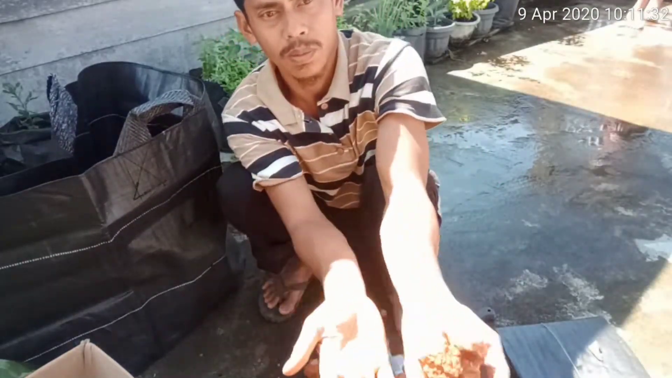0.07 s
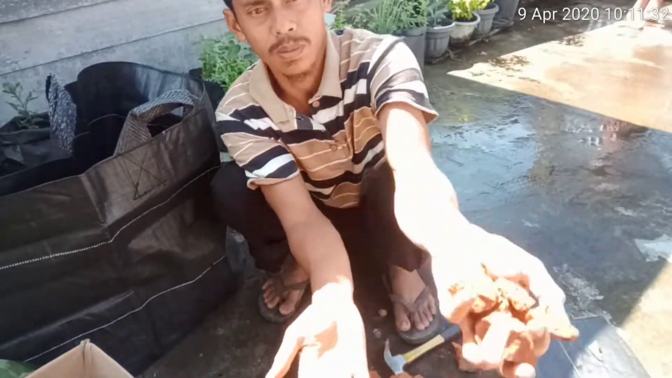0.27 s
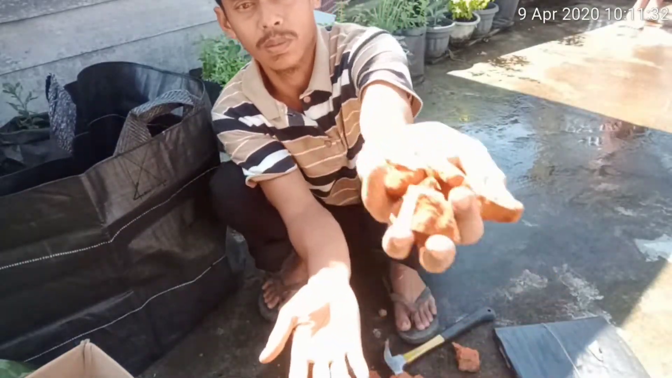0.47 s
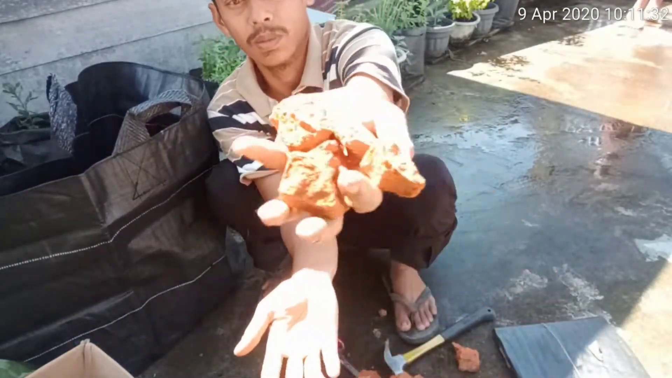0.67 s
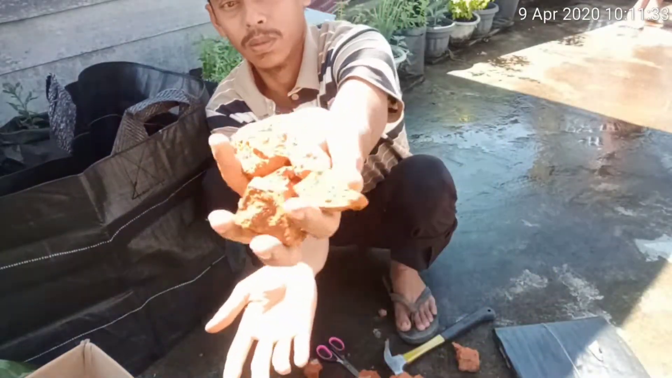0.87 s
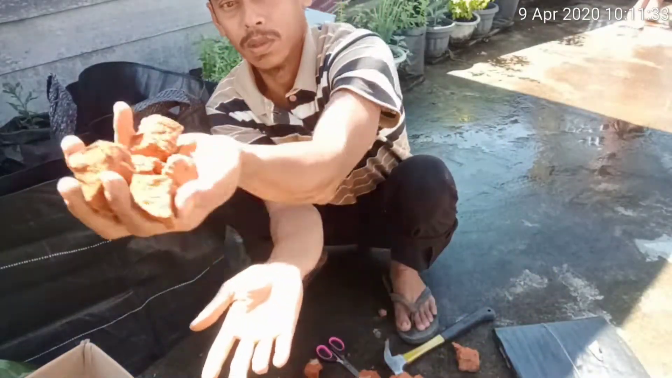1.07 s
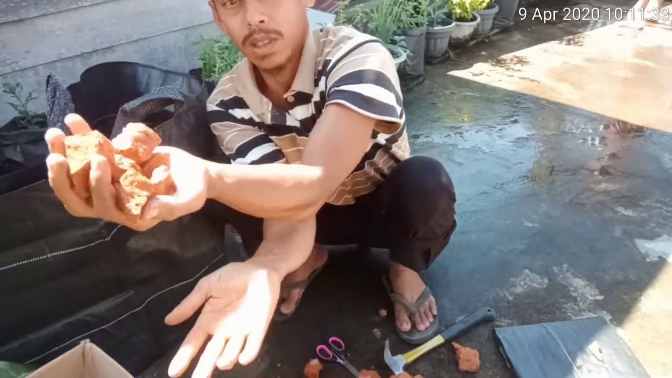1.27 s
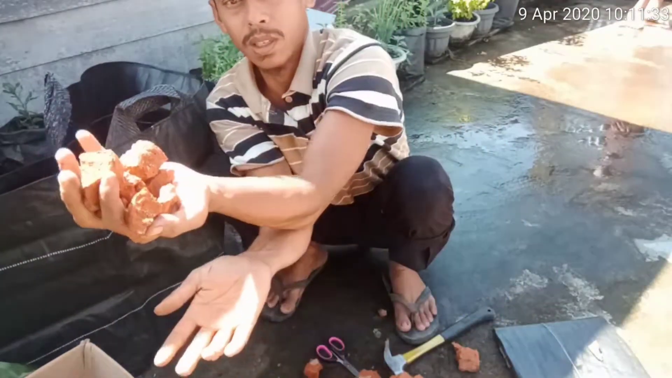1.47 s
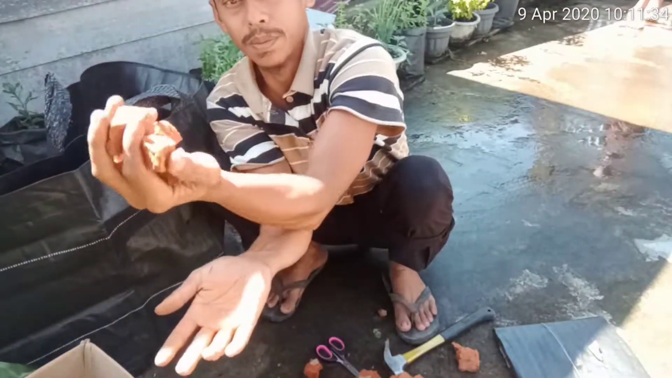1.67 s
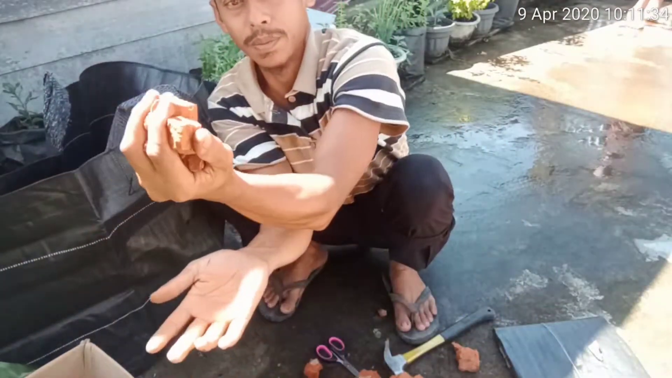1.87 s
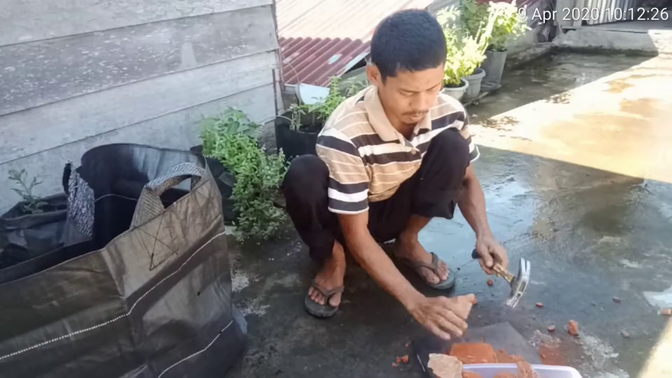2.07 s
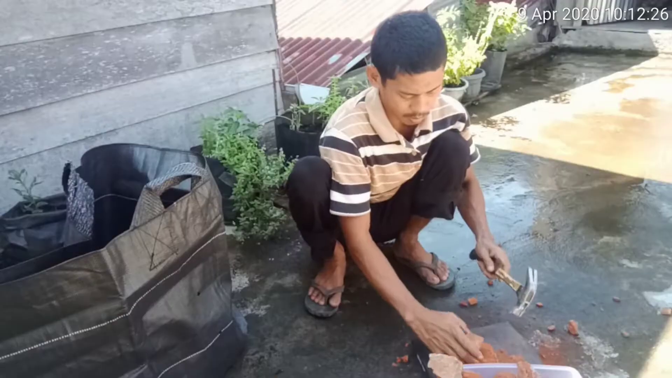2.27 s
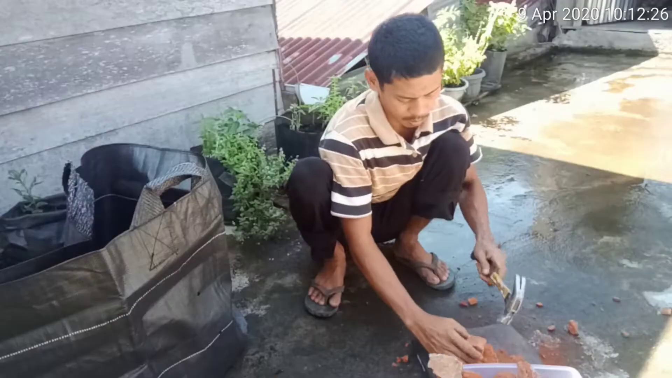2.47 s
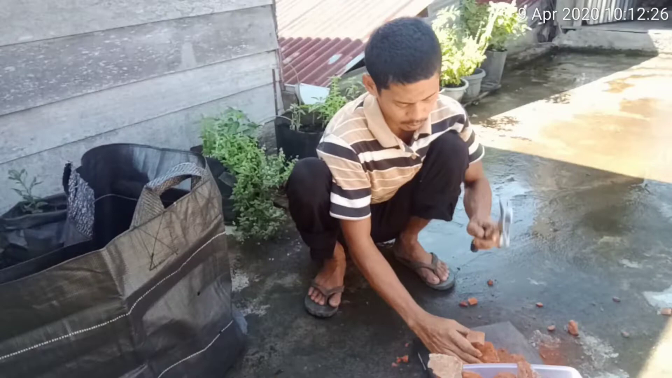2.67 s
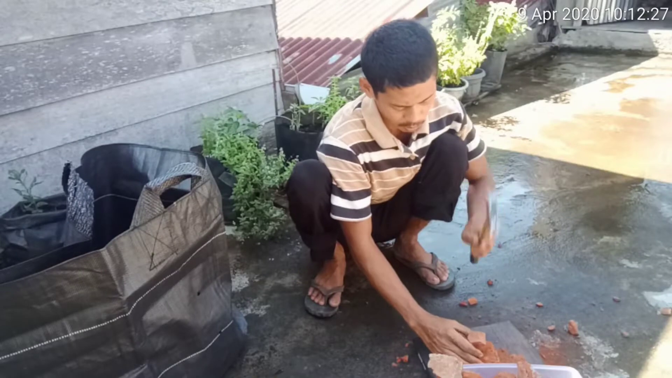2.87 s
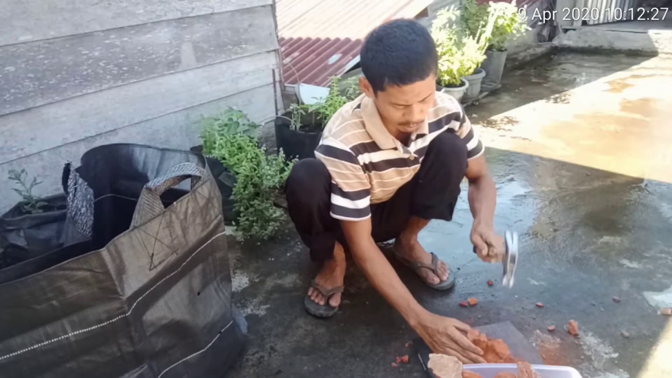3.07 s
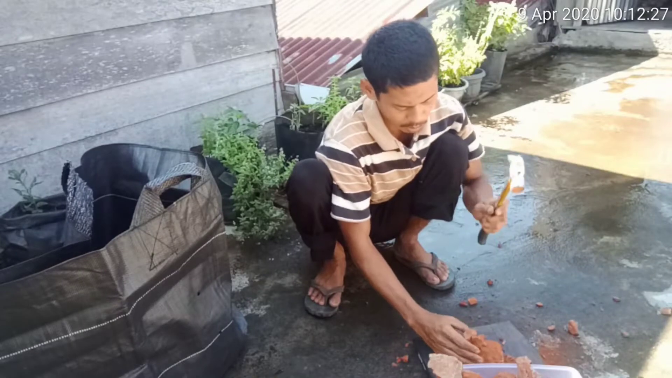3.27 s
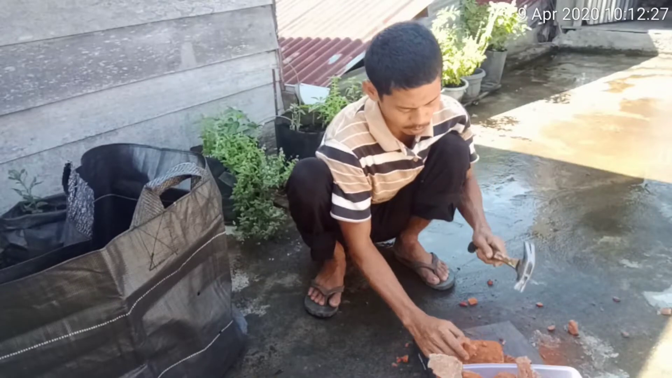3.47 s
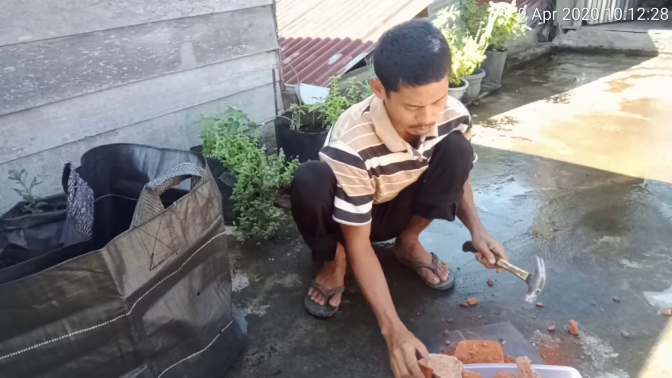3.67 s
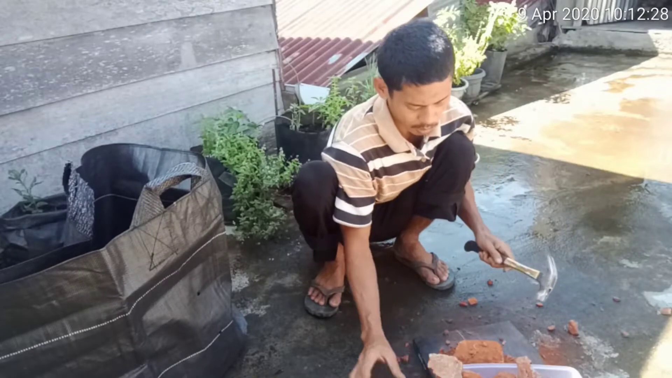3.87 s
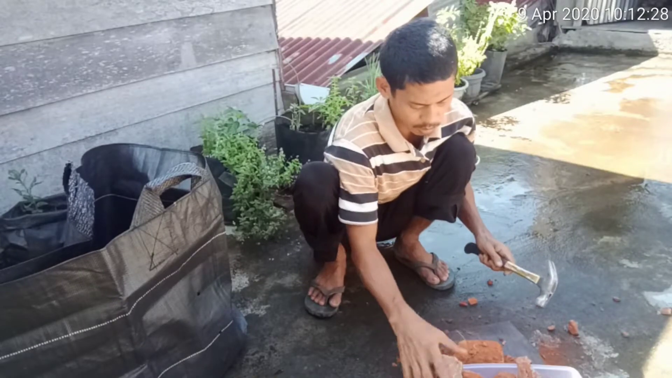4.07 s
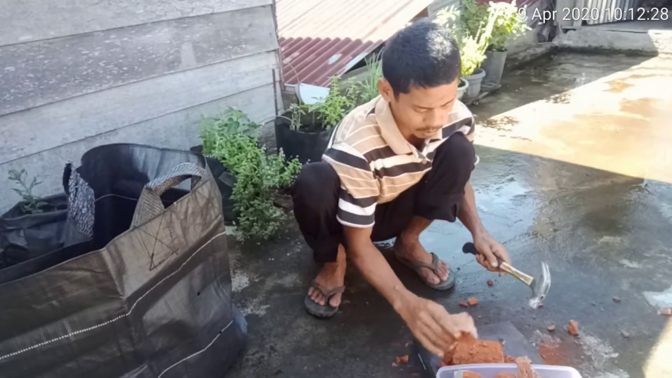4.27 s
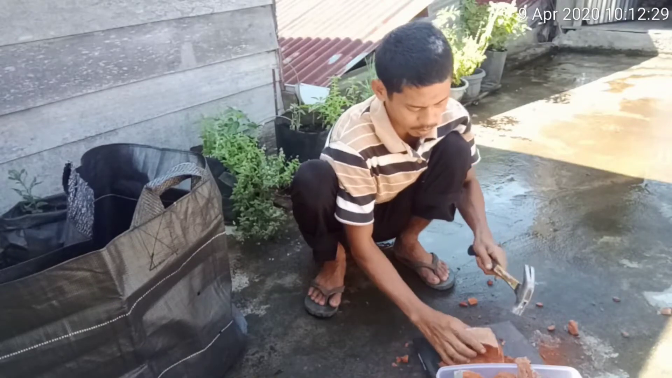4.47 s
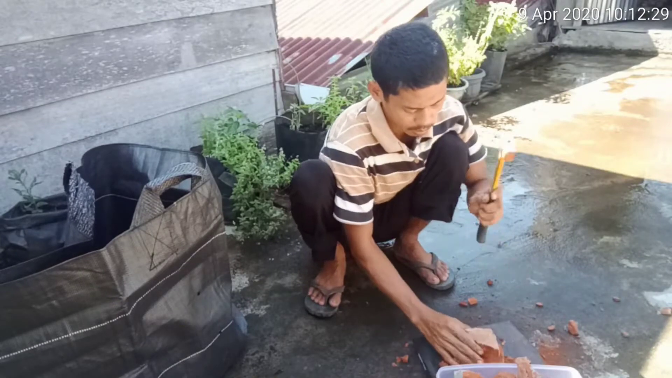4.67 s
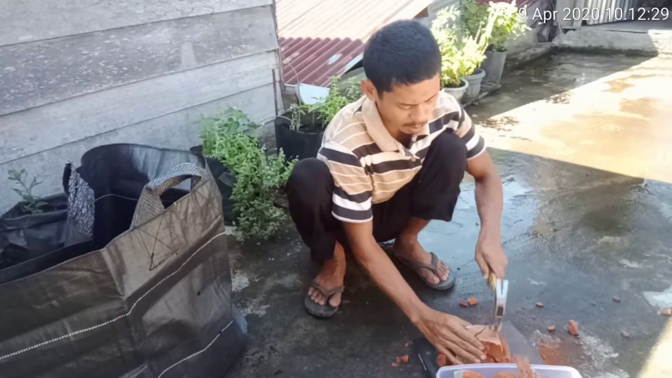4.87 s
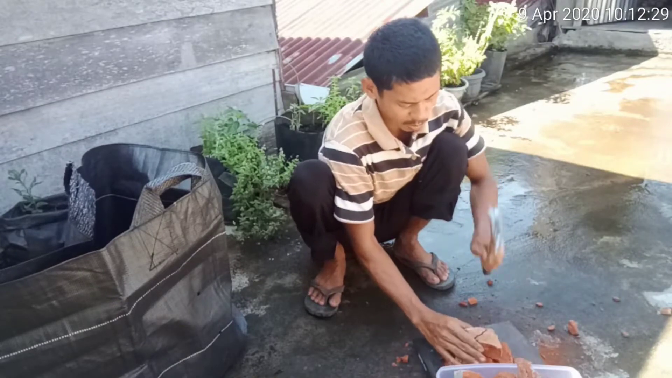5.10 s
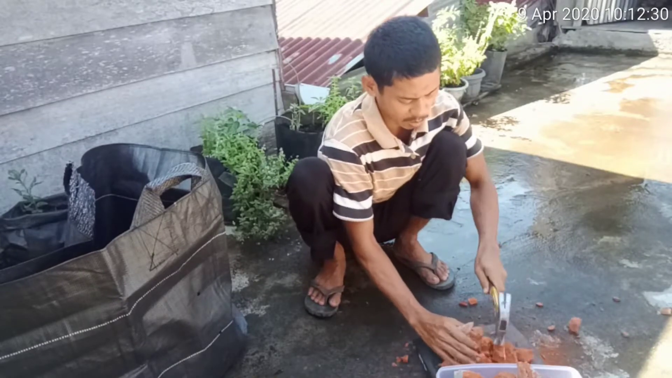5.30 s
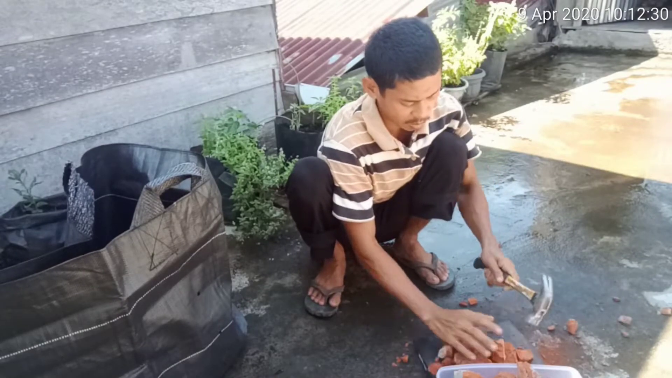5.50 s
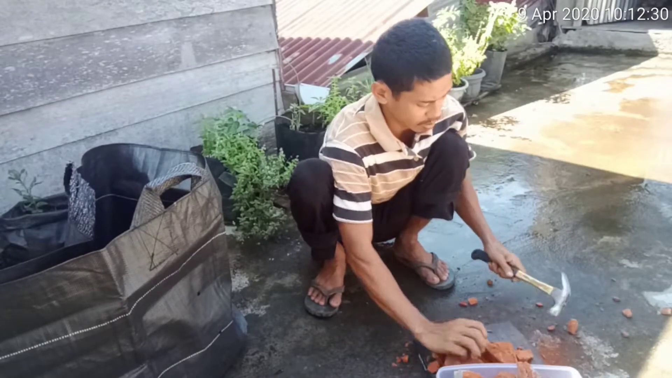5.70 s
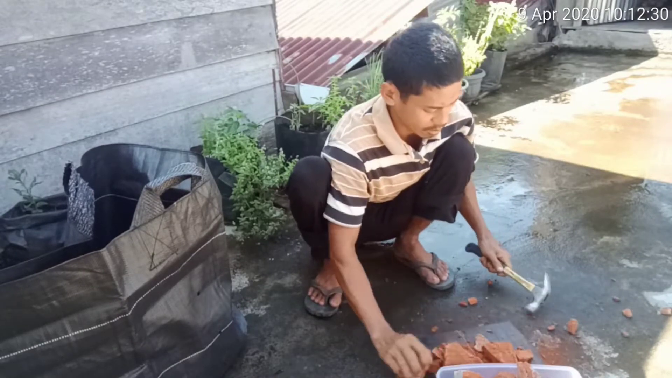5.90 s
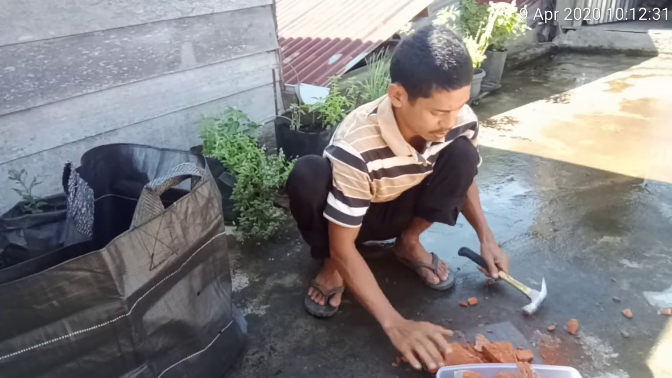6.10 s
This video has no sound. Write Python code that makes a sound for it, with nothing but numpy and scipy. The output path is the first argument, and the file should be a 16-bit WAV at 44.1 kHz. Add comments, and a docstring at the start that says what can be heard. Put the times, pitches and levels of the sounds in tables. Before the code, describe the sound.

Outdoor phone-like pickup, thin in the bass and slightly overloaded on the hits. Hen squawks ring at a little distance with yard echoes while gusts rumble at the microphone. After a quick dip, brick bits click and grit rubs nearby, a hammer strikes once, pieces are shifted on hollow tile, then two more sharp blows scatter fragments. Soft clucks continue behind.

```python
"""A hen squawks four times on a concrete rooftop: hoarse pulses and breath clear into a stack of overtones.
A hammer breaks clay brick on a hollow tile in three blows: snap, spreading crack, ringing tile and slab.
Brick pieces knock the tile (modes), shards click (short modes and a tick), grit scrapes (coloured grains).
Other fowl cluck softly further off (falling notes and rasp); gusts rumble and a town hums (shaped noise).
The sound fades out and in again once; it comes back louder."""
import sys
import numpy as np
from scipy import signal
from scipy.fft import rfft, irfft, next_fast_len
from scipy.io import wavfile
from scipy.ndimage import uniform_filter1d

SR = 44100
rng = np.random.default_rng(int(sys.argv[2]) if len(sys.argv) > 2 else 0)


def int16_out(signal):
    """Quantize to a 16-bit WAV file."""
    q = np.round(np.clip(np.atleast_2d(signal).T, -1, 1) * 32767)
    wavfile.write(sys.argv[1], SR, q.astype(np.int16))


N = 270818


def amp(db):
    """Decibels to linear amplitude."""
    return 10 ** (np.asarray(db) / 20)


def evened(x):
    """Scales x to unit RMS."""
    return x / np.sqrt(np.mean(x ** 2) + 1e-20)


def read(points, hz):
    """Reads a table of (frequency, value) on a log frequency axis."""
    f, value = np.transpose(points)
    return np.interp(np.log(hz + 1), np.log(f + 1), value)


def read_time(points, t):
    """Reads a table of (time, value)."""
    return np.interp(t, *np.transpose(points))


def add(mix, start_s, sound):
    """Adds sound into mix in place, cut at the end of mix."""
    part = mix[round(start_s * SR):][:len(sound)]
    part += sound[:len(part)]


def colour(x, points):
    """Filters x by a table of (frequency, gain), at unit RMS."""
    size = next_fast_len(len(x))
    gain = amp(read(points, np.fft.rfftfreq(size, 1 / SR)))
    return evened(irfft(rfft(x, size) * gain, size)[:len(x)])


def wobble(size, hz):
    """Random drift of unit RMS, low-passed at hz."""
    b, a = signal.butter(2, 2 * hz / SR)
    return evened(signal.lfilter(b, a, rng.standard_normal(size + 4000))[4000:])


def patchwork(shape, bins, frames):
    """Random time-frequency patches of unit RMS."""
    noise = rng.standard_normal(shape)
    return evened(uniform_filter1d(uniform_filter1d(noise, bins, 0), frames, 1))


def ring(hz, t60_s, t):
    """One damped mode."""
    return np.sin(2 * np.pi * hz * t) * amp(-60 * t / t60_s)


# wind spectrum: (frequency [Hz], relative gain [dB])
WIND_SPECTRUM = [(18, -68.5), (30, -18.5), (129, 0), (253, -10.5), (409, -21), (450, -38.5), (500, -24),
                 (650, -71), (1100, -120)]
# gusts at the microphone: (time [s], level [dB])
GUST_LEVELS = [(0.0, -39), (0.09, -35.5), (0.22, -40.5), (0.41, -38), (0.72, -39), (1.2, -45.5),
               (1.57, -42.5), (1.85, -45.5), (2.34, -53.5), (2.82, -53.5), (3.13, -52), (4.75, -52.5),
               (5.1, -50), (5.3, -55), (5.73, -56.5), (6.14, -48)]


def wind():
    """Turbulence at the microphone: low noise, lumpy in level, under the gust curve."""
    level_db = read_time(GUST_LEVELS, np.arange(N) / SR)
    return colour(rng.standard_normal(N), WIND_SPECTRUM) * amp(level_db + 2.15 * wobble(N, 11.0))


# town hum spectrum: (frequency [Hz], relative gain [dB])
HUM_SPECTRUM = [(240, -38.5), (400, -2), (481, -2.5), (753, -2), (964, -8.5), (1220, -5), (1510, -13.5),
                (2020, -13), (4380, -21), (6850, -27.5), (16000, -37)]
# hum drift: (time [s], level above HUM_DB [dB])
HUM_DRIFT = [(0, 13.5), (.7, 7), (1.9, 7), (2.3, 3.5), (2.9, 2), (3.6, 4.5), (4.4, 2.5), (5.15, 0.5),
             (6.14, -0.5)]
HUM_DB = -65


def town_hum():
    """Distant town: shaped noise whose level varies in time-frequency patches."""
    hz, _, z = signal.stft(rng.standard_normal(N + 1024), SR, nperseg=1024, noverlap=768)
    depth_db = np.where(hz < 6500, 2.9, 1.2)[:, None]
    z = z * amp(read(HUM_SPECTRUM, hz)[:, None] + depth_db * patchwork(z.shape, 10, 12))
    hum = evened(signal.istft(z, SR, nperseg=1024, noverlap=768)[1][:N])
    return hum * amp(HUM_DB + read_time(HUM_DRIFT, np.arange(N) / SR))


# squawks: (start [s], hoarse part [s], clear part [s], effort [dB], hoarse part softer by [dB],
# sag over the clear part [dB], base pitch [Hz], hoarseness before clearing [0-1], hoarseness after [0-1])
SQUAWK_ROWS = [(0.062, 0.096, 0.11, -31.5, 1.2, 0.4, 607.8, 0.75, 0.05),
               (1.392, 0.078, 0.16, -31.5, 2, 5, 602.4, 0.85, 0.06),
               (2.985, 0.155, 0.11, -34.5, 4.2, 8.1, 610.7, 0.4, 0.06),
               (6.017, 0.045, 0.22, -36, 0.67, .4, 589, 0.9, 0.7)]
# clean note: (multiple of pitch, relative level [dB])
NOTE_PARTIALS = [(1, -12.5), (2, -1.5), (3, -9.5), (4, -5.5), (5, -24.5), (6, -15), (7, -35.5), (8, -35.5),
                 (9, -32), (10, -53), (11, -50.5), (12, -39.5), (13, -41), (14, -37), (15, -37.5),
                 (16, -35), (17, -52.5)]
# hoarse rasp: (frequency [Hz], relative gain [dB])
RASP_SPECTRUM = [(300, -28.5), (600, -25), (820, -13.5), (1250, -12), (1500, -14.5), (2500, -18),
                 (3800, -21), (4600, -36.5), (5600, -33.5), (6300, -49), (9500, -47), (12000, -60.5)]
ONSET_S, ONSET_DB, RASP_ONSET_DB = 0.035, -8, -1.5  # start level, rising to 0 dB
RELEASE_S, RELEASE_DB = 0.021, 0.5  # slight lift just before the cut-off
CLEARING_S, RASP_LINGERS_S = 0.014, 0.018
SCOOP, SCOOP_S = .2, .025  # pitch slides up from this share below
STRAIN, CREEP_HZ_PER_S = .07, 70  # pitch overshoot while hoarse, steady upward creep
WANDER = .005  # slow pitch drift (share)
VEIL_DB = -4.5  # partials other than the second, before clearing
SLIP_CHANCE, BREATH = .05, .4  # miscount of the pulse triples; breath noise share


def hen_pitch_hz(t, hoarse_s, base_hz, hoarse_before):
    """Voice pitch: scoop up, strained overshoot, steady creep."""
    strain = STRAIN * hoarse_before ** 2 * np.clip(4 * (1 - t / hoarse_s), 0, 1)
    return base_hz * (1 - SCOOP * np.exp(-t / SCOOP_S) + strain) + CREEP_HZ_PER_S * (t - hoarse_s)


def clear_note(turns, cleared):
    """Harmonic stack; each partial wavers on its own."""
    note = np.zeros(len(turns))
    for k, db in NOTE_PARTIALS:
        veil_db = 0 if k == 2 else VEIL_DB * (1 - cleared)
        waver_db = (1.6 if k == 2 else 2.6) * wobble(len(turns), 35)
        note += amp(db + veil_db + waver_db) * np.cos(2 * np.pi * (k * turns + rng.random()))
    return evened(note)


def hoarse_rasp(turns, t):
    """Voice pulses stressed in threes plus breath, smeared by near surfaces."""
    size = len(t)
    beats = np.diff(np.floor(turns + .02 * wobble(size, 200)), prepend=0) > 0
    count = np.cumsum(beats * (1 + (rng.random(size) < SLIP_CHANCE)))
    strong = count % 3 == 0
    pulses = beats * (strong - 0.25) * amp(1.5 * rng.standard_normal(size))
    source = evened(pulses) + BREATH * rng.standard_normal(size)
    scatter = rng.standard_normal(800) * np.exp(-np.arange(800) / 180)
    rasp = colour(signal.oaconvolve(source, scatter)[:size], RASP_SPECTRUM)
    return rasp * amp(RASP_ONSET_DB * np.maximum(1 - t / ONSET_S, 0))


def squawk(hoarse_s, clear_s, effort_db, soft_db, sag_db, base_hz, hoarse_before, hoarse_after):
    """Rough voicing gives way to steadier voicing: rasp crossfades towards the harmonic stack."""
    t = np.arange(0, hoarse_s + clear_s, 1 / SR)
    since_clear_s = t - hoarse_s
    cleared = np.clip(since_clear_s / CLEARING_S + .5, 0, 1)
    settled = np.clip(since_clear_s / RASP_LINGERS_S - .5, 0, 1)
    hoarse = np.clip(hoarse_before + (hoarse_after - hoarse_before) * settled, 0, .95)

    level_db = effort_db - soft_db * (1 - cleared) - sag_db * np.maximum(since_clear_s, 0) / clear_s
    level_db += ONSET_DB * np.maximum(1 - t / ONSET_S, 0)
    level_db += RELEASE_DB * np.maximum(1 - (t[-1] - t) / RELEASE_S, 0)

    jitter = (0.002 + .01 * hoarse) * wobble(len(t), 70) + WANDER * wobble(len(t), 15)
    turns = np.cumsum(hen_pitch_hz(t, hoarse_s, base_hz, hoarse_before) * (1 + jitter)) / SR
    voice = np.sqrt(1 - hoarse ** 2) * clear_note(turns, cleared)
    voice += hoarse * amp(1.5) * hoarse_rasp(turns, t)
    return amp(level_db) * voice * signal.windows.tukey(len(t), .06)


# reverberation: (frequency [Hz], t60 [s])
YARD_T60 = [(200, 0.2), (1200, 0.4), (3000, 0.4), (9000, 0.46)]


def yard(x):
    """Walls and roofs around: sparse echoes of random sign, each band dying at its own speed."""
    taps = np.zeros(SR)
    at = np.arange(500, SR - 20, 20) + rng.integers(0, 20, (SR - 501) // 20)
    taps[at] = rng.choice([-1., 1.], at.shape)
    hz, t, z = signal.stft(taps, SR, nperseg=256)
    decay = amp(-60 * t / read(YARD_T60, hz)[:, None])
    tail = signal.istft(z * decay, SR, nperseg=256)[1]
    return signal.fftconvolve(x, tail / np.linalg.norm(tail))[:N]


FAR_WALL_S, FAR_WALL_DB = .18, -24.5


def far_wall(fowl):
    """One late, dull, diffuse echo, undelayed here."""
    smear = colour(rng.standard_normal(1600), [(2500, 0), (6000, -20)]) / 40  # unit energy
    return amp(FAR_WALL_DB) * signal.oaconvolve(fowl, smear)[:N]


def crumbs(size, per_s, share, patchy_db):
    """Dense fine friction with separate larger grains; each bit of clay rings briefly in its own band."""
    hits = rng.random(size) < per_s / SR
    boost_db = 1.5 * np.minimum(rng.exponential(1, size), 3)
    grains = hits * rng.standard_normal(size) * amp(boost_db)
    friction = rng.standard_normal(size) + share * evened(grains)
    z = signal.stft(friction, nperseg=256, noverlap=192)[2]
    z = z * amp(patchy_db * patchwork(z.shape, 5, 9))
    return signal.istft(z, nperseg=256, noverlap=192)[1][:size]


# grit on concrete; at 4.45 s the short noise of a brick piece knocking:
# (start [s], rise [s], hold [s], decay t60 [s], grind level [dB], hiss level [dB])
GRIT_ROWS = [(0.524, 0.023, 0.013, 0.19, -73, -46.5), (2.207, 0.011, 0.036, 0.15, -43.5, -54.5),
             (2.532, 0.03, 0.045, 0.13, -48.5, -56.5), (3.002, 0.013, 0.0058, 0.99, -38.5, -60),
             (3.015, 0.011, 0.16, 0.26, -51, -53.5), (3.992, 0.029, 0.0071, 0.14, -50.5, -87),
             (4.192, 0.016, 0.011, 0.15, -39, -63.5), (4.45, 0.0034, 0.0087, 0.06, -38, -50.5),
             (4.46, 0.01, .005, 1.6, -56, -66.5), (4.885, 0.017, 0.0044, 0.5, -34.5, -46.5),
             (5.239, 0.015, 0.14, 0.61, -41.5, -52), (5.663, 0.058, 0.003, 0.3, -43, -48.5),
             (5.801, 0.034, 0.21, 0.34, -56, -66)]
# dull part: (frequency [Hz], relative gain [dB])
GRIND_SPECTRUM = [(300, 2.5), (600, 7.5), (1250, 2.5), (2000, 1), (3500, -7.5), (5000, -10.5),
                  (8000, -40.5)]
# bright part: (frequency [Hz], relative gain [dB])
HISS_SPECTRUM = [(2500, -16.5), (4500, -5.5), (6500, -6), (7500, -4), (8500, -12.5), (11000, -10.5),
                 (13000, -29), (15500, -18.5)]
SLIP_IN_DB = -18  # start of the rise, relative to the hold


def grit(rise_s, hold_s, t60_s, grind_db, hiss_db):
    """Many small grains slipping: a dull grind and a bright hiss from the same lumpy motion."""
    t = np.arange(0, rise_s + hold_s + t60_s / 2, 1 / SR)
    stroke_db = SLIP_IN_DB * np.maximum(1 - t / rise_s, 0)
    stroke_db -= 60 * np.maximum(t - rise_s - hold_s, 0) / t60_s
    lumps_db = wobble(len(t), 200) + 2.1 * wobble(len(t), 45)
    slips = crumbs(len(t), 500, .5, patchy_db=3.5) * amp(lumps_db)
    grind = amp(grind_db) * colour(slips, GRIND_SPECTRUM)
    hiss = amp(hiss_db) * colour(slips, HISS_SPECTRUM)
    return amp(stroke_db) * (grind + hiss)


# distant clucks, and at 2.185 s the dying tail of a squawk:
# (start [s], note level [dB], pitch [Hz], length [s], roughness, rasp level [dB])
CLUCK_ROWS = [(1.138, -51.5, 497, 0.038, 0.06, -67), (1.32, -41.5, 854, 0.066, 0.99, -50),
              (1.35, -34, 470.4, 0.065, 0.47, -43.5), (1.36, -38, 335, 0.074, 0.97, -61),
              (1.757, -44.5, 890, 0.053, 0.88, -54), (2.185, -45.5, 1228, 0.11, 0.32, -69),
              (2.783, -47, 915, 0.054, 0.79, -62), (3.358, -51.5, 997, 0.095, 1.02, -87),
              (3.425, -52, 996, 0.11, 0.05, -91), (4.024, -53.5, 866, 0.18, 0.62, -83),
              (5.941, -48, 968, 0.055, 0.6, -61)]


def cluck(note_db, hz, length_s, rough, rasp_db):
    """A falling note with weak overtones, broken by uneven flutter, and a throaty rasp above it."""
    t = np.arange(0, length_s, 1 / SR)
    glide = 1.03 - 0.053 * t / length_s + 0.13 * rough * wobble(len(t), 223)
    turns = np.cumsum(hz * glide) / SR
    note = sum(amp(-11 * k * hz / 800) * np.sin(2 * np.pi * (k + 1) * turns) for k in range(4))
    throat = [(1300, -33.5), (2100, 1.0), (3800, -7.0), (5500, -30.0), (12000, -45.0)]
    rasp = colour(rng.standard_normal(len(t)), throat) * np.hanning(len(t))
    flutter = amp(4.5 * rough * wobble(len(t), 84))
    return (amp(note_db) * note + amp(rasp_db) * rasp) * flutter * signal.windows.tukey(len(t), .5)


def burst(points, t60_s):
    """A spatter of tiny fractures that dies away."""
    t = np.arange(0, .5, 1 / SR)
    spatter = crumbs(len(t), 1200, .36, patchy_db=2.5) * amp(1.5 * wobble(len(t), 200))
    return colour(spatter, points) * amp(-60 * t / t60_s) * np.minimum(t / 0.0005, 1)


# shard clicks: (start [s], level [dB], centre of the ring [Hz], tick t60 [s])
SHARD_ROWS = [(2.2195, -37, 3020, 0.054), (2.3176, -42.5, 1590, 0.17), (2.501, -47, 3470, 0.13),
              (2.6628, -51, 2850, 0.086), (2.722, -50.5, 5660, 0.077), (3.1936, -39, 1800, 0.044),
              (3.352, -40, 2010, 0.07), (3.4204, -40, 1700, 0.065), (3.7788, -53.5, 6900, 0.094),
              (3.9926, -40.5, 1380, 0.12), (4.011, -40.5, 2440, 0.056), (4.028, -47, 2770, 0.075),
              (4.603, -47, 5400, 0.1), (4.6613, -44, 3220, 0.11), (4.73, -39, 3340, 0.092),
              (4.927, -30, 1950, 0.03), (4.99, -33, 2620, 0.039), (5.029, -38, 2230, .04),
              (5.079, -45.5, 840, 0.16), (5.3584, -38, 2400, 0.01), (5.387, -32, 3500, 0.057),
              (5.429, -33, 2490, 0.06), (5.483, -42.5, 3800, 0.054), (5.519, -40, 2420, 0.085),
              (5.576, -48.5, 5600, 0.12), (5.744, -37, 1535, 0.21), (5.8129, -40.5, 4020, 0.063),
              (5.89, -52, 3750, 0.026), (5.9189, -42, 2260, 0.053), (5.9398, -39.5, 3530, 0.044),
              (5.967, -40, 1300, 0.066), (6.0177, -21, 2730, 0.018)]
# breaking clay, also the base of each tick: (frequency [Hz], relative gain [dB])
CRACK_SPECTRUM = [(59, -13.5), (100, -10.5), (570, 3), (950, -8.5), (1280, -3.5), (1800, -13.5), (2860, -7),
                  (3860, -13.5), (4670, -26.5), (5300, -19.5), (7400, -30.5), (8280, -35), (11000, -36.5),
                  (13000, -44), (15000, -36), (16000, -55)]
TICK_DB_PER_OCTAVE = -2.5  # away from the ring


def shard(level_db, hz, t60_s, size=4410):
    """A hard fragment struck: a cluster of close, short modes and a tick strongest near them."""
    t = np.arange(size) / SR
    cluster = sum(ring(hz * (1 + .12 * d), t60_s * .7, t) for d in rng.standard_normal(5))
    near = [(f, db + TICK_DB_PER_OCTAVE * abs(np.log2(f / hz))) for f, db in CRACK_SPECTRUM]
    return amp(level_db) * (0.2 * cluster + 0.44 * burst(near, t60_s)[:size])


# hollow tile modes: (frequency [Hz], base level [dB], t60 [s])
TILE_MODES = [(320.3, 6.5, 0.21), (547.8, 3, 0.18), (869, -9.5, 0.17), (952, -17, 0.1), (1460, -19, 0.23),
              (2720, -31, 0.017)]


def tile(deep_db, free_s):
    """Modes of the hollow tile; the striking point shifts their balance, contact damps them after free_s."""
    t = np.arange(0, .3, 1 / SR)
    sound = np.zeros(len(t))
    for i, (hz, db, t60_s) in enumerate(TILE_MODES):
        lift_db = (deep_db if i == 0 else 0) + 1.5 * rng.standard_normal()
        sound += amp(db + lift_db) * ring(hz, t60_s, t)
    damping_db = -60 * np.maximum(t - free_s, 0) / 0.034
    return sound / abs(sound).max() * amp(2.2 * wobble(len(t), 60) + damping_db)


# hammer blows: (start [s], snap level [dB], slab thump level [dB], tile ring level [dB], crack level [dB],
# crack t60 [s], crack tilt towards 3 kHz [dB per octave], share of the crack there at once [0-1])
BLOW_ROWS = [(2.9623, -5, -31, -17, -14, 0.2, -0.5, 0.58), (4.8615, -9, -24.5, -26, -16.5, 0.2, 5.5, 0.32),
             (5.2107, 4.5, -36.5, -52, -13, 0.15, 1, 0.78)]
SNAP_HZ, SNAP_T60_S = 2910, .015  # steel contact is over at once
CRACK_SPREAD_S = 0.0097  # time for a whole crack to run through the brick


def blow(snap_db, thump_db, tile_db, crack_db, crack_t60_s, tilt_db, at_once):
    """Steel meets brick: a sharp snap, the crack running on, the tile and the slab ringing."""
    t = np.arange(0, .5, 1 / SR)
    # hard clay favours 3 kHz; the tilt is 0.53 as steep above it
    tilted = [(hz, db - tilt_db * max(np.log2(3000 / hz), 0.53 * np.log2(hz / 3000)))
              for hz, db in CRACK_SPECTRUM]
    spread = np.clip(at_once + t / CRACK_SPREAD_S, 0, 1)
    sound = amp(snap_db) * shard(0, SNAP_HZ, SNAP_T60_S, len(t))
    sound += amp(crack_db) * burst(tilted, crack_t60_s) * spread
    slab = ring(107.7, 0.77, t) + 0.74 * ring(197.1, 0.38, t)
    sound += amp(thump_db) * slab * (.7 + .8 * wobble(len(t), 30))
    add(sound, 0, amp(tile_db) * tile(0, 0.059))
    return sound


# pieces set down on the tile: (start [s], tile ring level [dB], deepest mode lift [dB], click level [dB],
# click ring [Hz], free ringing [s])
KNOCK_ROWS = [(3.898, -38, -17, -75, 1560, 0.03), (4.119, -45, -11, -45, 2960, 0.04),
              (4.21, -21, -21, -31, 1306, 0.057), (4.449, -26, -38, -26, 2890, 0.0026),
              (4.567, -38.5, -9, -25, 1470, 0.019), (5.297, -9, -5.5, -12.5, 1510, 0.037),
              (5.32, -28, 9, -18.5, 2220, 0.012), (5.337, -25.5, 24, -17.5, 1925, 0.0074)]


def knock(ring_db, deep_db, click_db, click_hz, free_s):
    """A brick piece excites the tile, then damps it; its own edge clicks."""
    sound = amp(ring_db) * tile(deep_db, free_s)
    add(sound, 0, shard(click_db, click_hz, 0.056))
    return sound


def scene():
    """The fowl are far and wet, the bricks near and dry."""
    fowl, near = np.zeros(N), np.zeros(N)
    for mix, play, rows in [(fowl, squawk, SQUAWK_ROWS), (near, grit, GRIT_ROWS), (fowl, cluck, CLUCK_ROWS),
                            (near, shard, SHARD_ROWS), (near, blow, BLOW_ROWS), (near, knock, KNOCK_ROWS)]:
        for start_s, *row in rows:
            add(mix, start_s, play(*row))
    add(fowl, FAR_WALL_S, far_wall(fowl))
    echoes = yard(amp(-4.0) * fowl + amp(-16.5) * near)
    mix = fowl + near + echoes + wind() + town_hum()
    return np.array([mix, mix])


OUT_AT_S, OUT_S, IN_AT_S, IN_S = 1.966, 0.084, 2.116, 0.071
BEFORE_DB, AFTER_DB, FLOOR_DB = 1.33, 5, -66.5  # gains, and a floor added throughout


def fade():
    """Gain: straight fade out, near silence, straight fade in to a higher level."""
    t = np.arange(N) / SR
    before = np.clip(1 - (t - OUT_AT_S) / OUT_S, 0, 1)
    after = np.clip((t - IN_AT_S) / IN_S, 0, 1)
    return amp(BEFORE_DB) * before + amp(AFTER_DB) * after + amp(FLOOR_DB)


EDGE_HZ = 15900
SIDE_SMEAR, SIDE_NOISE = 1e-3, 8e-5  # faint smeared copy and noise, opposite sign in the two channels


def record(dry):
    """Bass cut; the port rings near 1.2 kHz; soft overload; a faint side signal; fade; band limit."""
    thin = signal.lfilter(*signal.butter(2, 75, "high", fs=SR), dry)
    port = signal.lfilter(*signal.iirpeak(1245, 11, SR), thin)
    loud = np.tanh(thin + 2.03 * port) * 0.67
    smeared = signal.oaconvolve(loud[0], rng.choice([-1., 1.], 256) * np.hanning(256))[:N]
    side = SIDE_SMEAR * smeared + SIDE_NOISE * rng.standard_normal(N)
    faded = (loud + side * [[1], [-1]]) * fade()
    low_pass = signal.firwin(511, EDGE_HZ, window=("kaiser", 9), fs=SR)
    return signal.oaconvolve(faded, low_pass[None], "same")


dry = scene()
out = record(dry)
int16_out(out)
```